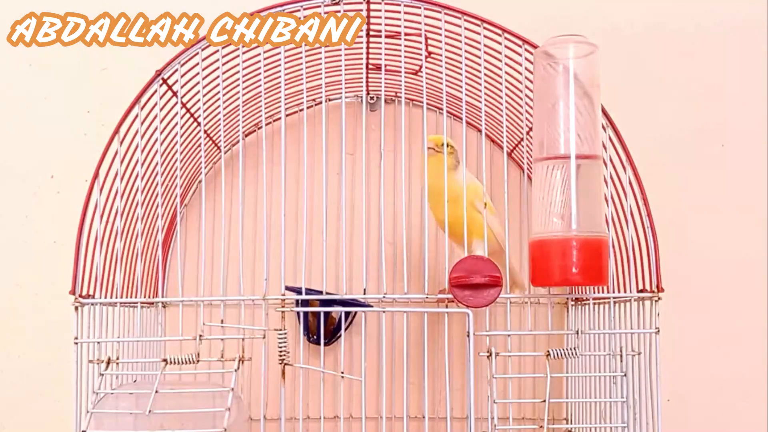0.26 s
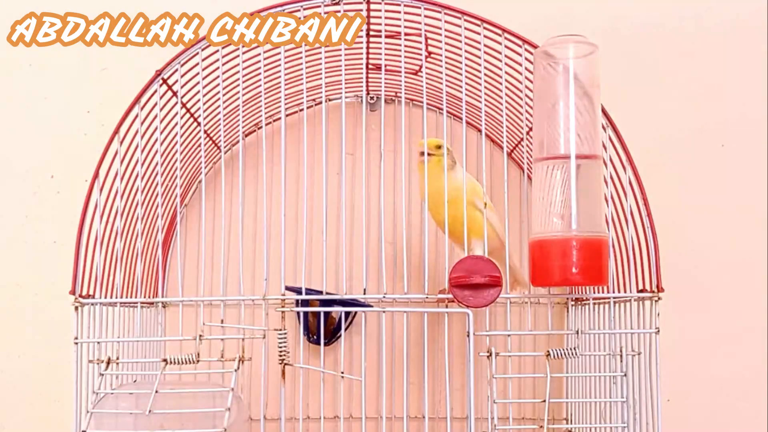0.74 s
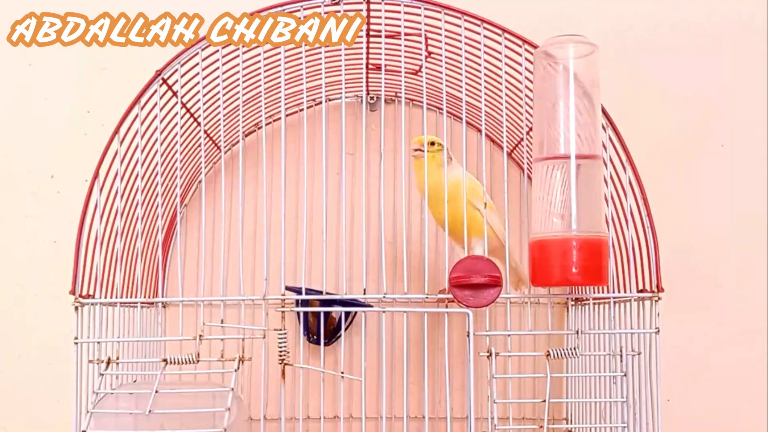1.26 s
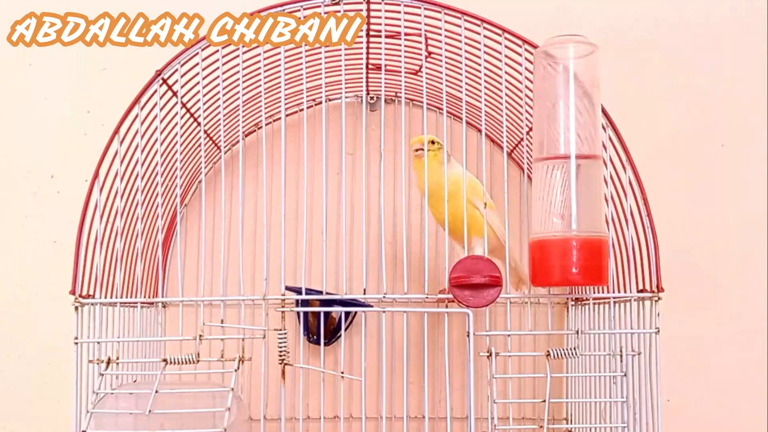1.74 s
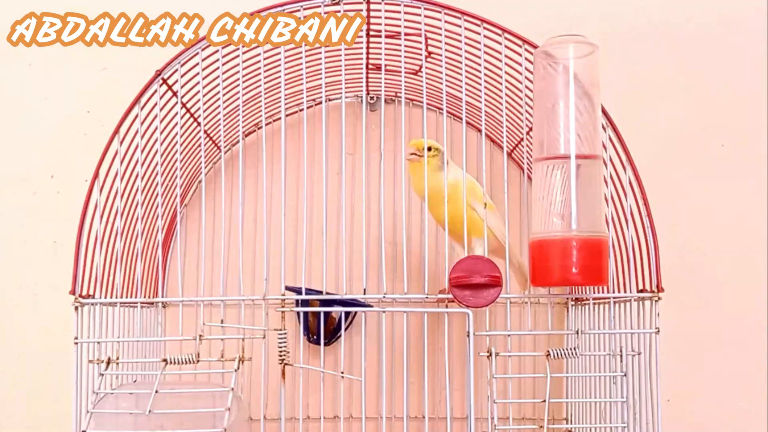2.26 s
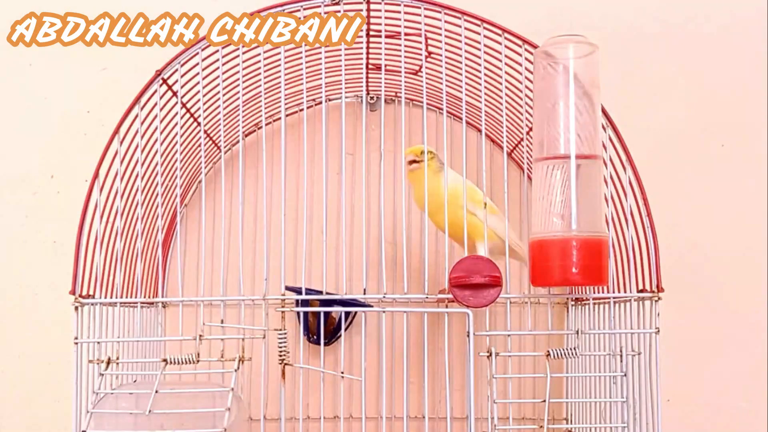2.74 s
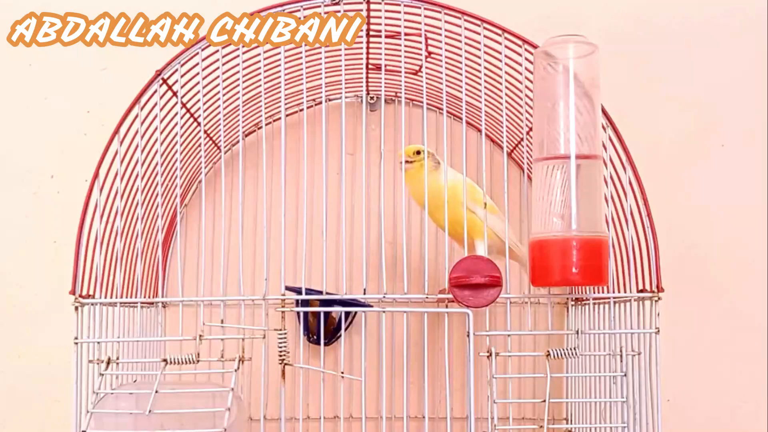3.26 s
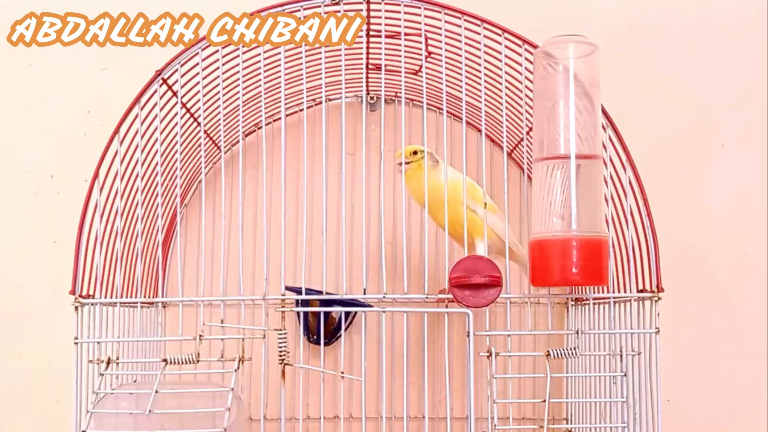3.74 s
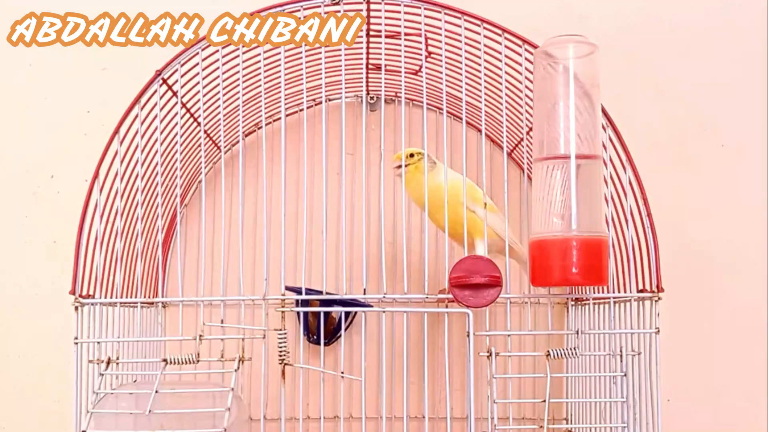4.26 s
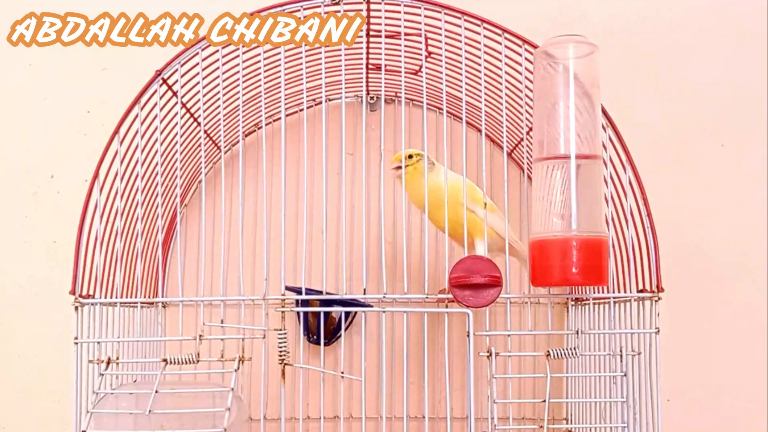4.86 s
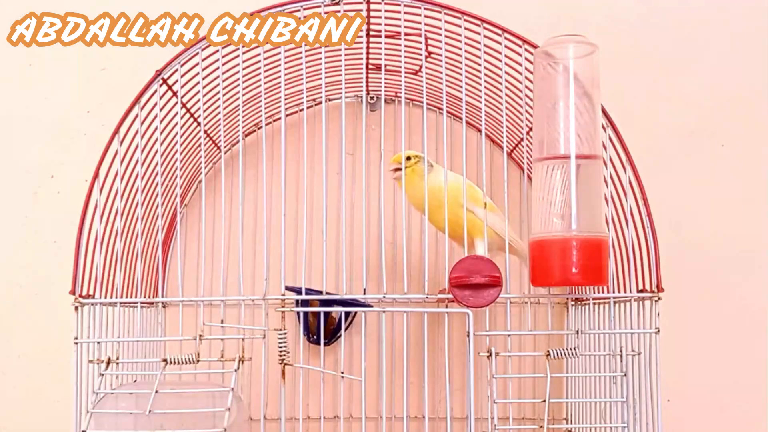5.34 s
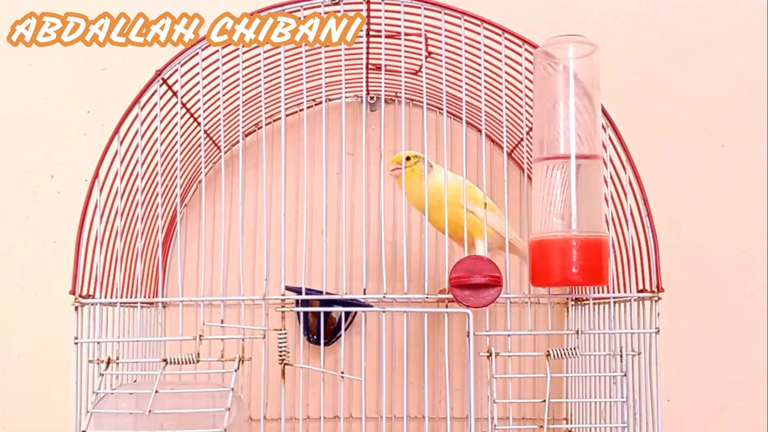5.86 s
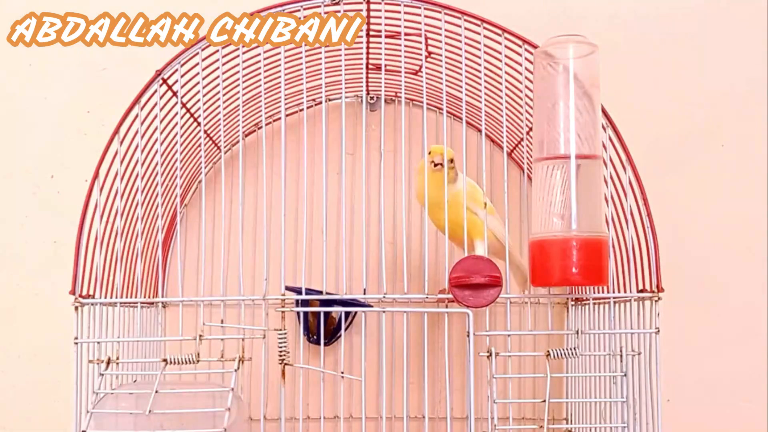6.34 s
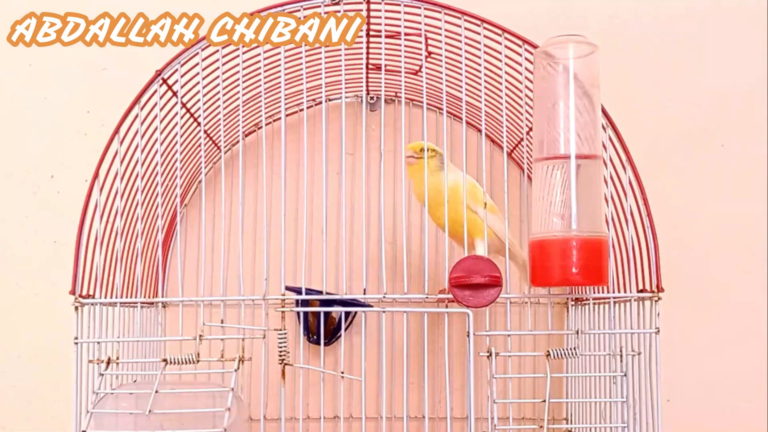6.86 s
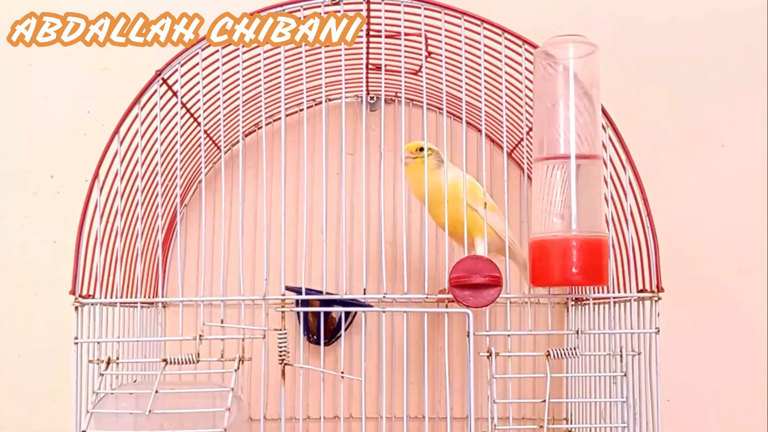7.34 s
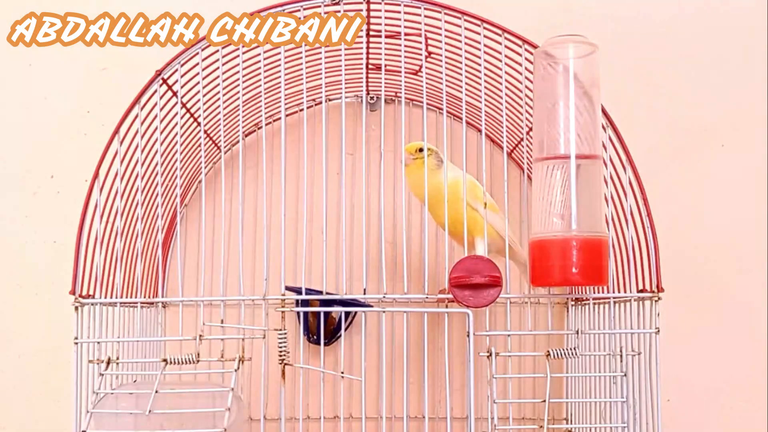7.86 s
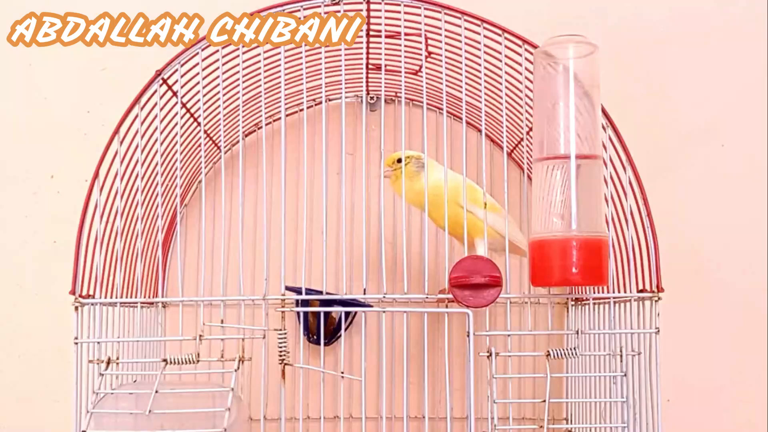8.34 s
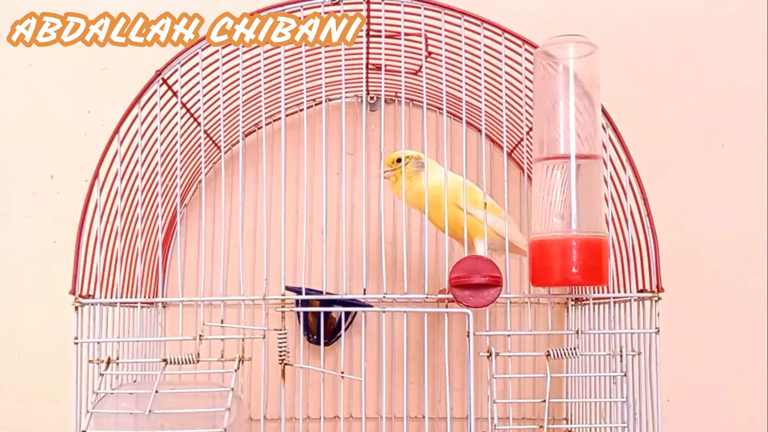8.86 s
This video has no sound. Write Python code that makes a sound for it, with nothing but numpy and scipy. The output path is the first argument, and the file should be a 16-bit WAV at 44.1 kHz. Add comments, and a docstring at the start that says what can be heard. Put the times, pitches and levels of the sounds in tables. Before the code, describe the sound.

A caged canary sings an unbroken chain of fast trills, long whistled slurs and sharp chinks in a bare echoing room, others answering faintly.

```python
"""A bare, echoing room, with a caged canary near the microphone and other canaries farther off.
The near bird sings a chain of trills, slurs, rolls and chinks; the far ones sing along, mostly as echo.
Each syllable is one gliding, almost pure tone, repeated with small changes and smeared by the room.
Buzzy rolls are fast upward strokes of the same tone; the hollow roll is a low throbbing whistle.
Wing beats and dull bumps are puffs of coloured noise, over a faint background hiss of changing level."""
import sys
import numpy as np
from scipy import signal
from scipy.fft import rfft, irfft
from scipy.io import wavfile
from scipy.ndimage import uniform_filter1d, minimum_filter1d, map_coordinates

SR = 44100
rng = np.random.default_rng(int(sys.argv[2]) if len(sys.argv) > 2 else 0)


def inscribe(sig):
    """Save sig as 16-bit PCM at rate SR to the path in sys.argv[1].

    A 1-D sig is mono; a 2-D sig holds one channel per row.
    Samples are clipped to [-1, 1] before scaling.
    """
    pcm = np.round(np.clip(np.atleast_2d(sig).T, -1, 1) * 32767)
    wavfile.write(sys.argv[1], SR, pcm.astype(np.int16))


N = 401310

# Levels are relative: gesture and trill levels add up, then the room and microphone shape them.
# Glide of each syllable before its pitch and length factors: time_ms, pitch_hz, level_db
GESTURES = { "flick": [(0, 4960, -10), (2.5, 5430, -0.5), (5.5, 6690, -2), (9, 7840, 5)],
            "pip": [(0, 1680, -27), (6, 2260, -10), (12.5, 2660, 5), (19, 2820, -3)],
            "rise": [(0, 1543, -28), (6.04, 2300, -3.5), (14.55, 2750, 4.5), (18.96, 3100, -3.5),
            (28, 3450, -5.5)], "tick": [(0, 6900, -25), (3.96, 5700, -16.5), (9.18, 4800, -9),
            (13.5, 4350, -2), (18.03, 3950, -1.5), (21.78, 3520, -6)], "slur": [(0, 2650, -21.5),
            (9.99, 3220, -6), (18.06, 3560, 1), (30.4, 3950, 0), (40.93, 4160, -1), (48.9, 4360, 3),
            (64.1, 4420, -6.5)], "whistle": [(0, 3660, -12), (20, 3610, -3), (55, 3560, 0), (85, 3515, -3),
            (100, 3470, -16)], "dive": [(0, 7600, -18), (22.03, 6900, -17), (41.82, 5900, -9),
            (55.36, 5200, -7), (66.3, 4500, -10.5), (77, 4000, -5), (82.8, 3150, 0), (89.9, 2880, -4.5),
            (96.1, 2140, -13.5)], "swoop": [(0, 7600, -19), (50, 6550, -11), (68, 5700, -18),
            (90, 5100, -10), (112, 4450, -10), (121, 4100, 2.5), (133, 3800, 1.5), (142, 3550, -9)],
            "drop": [(0, 2900, -1), (8.83, 2650, 3.5), (18.12, 2000, -9), (27.14, 1550, -12.5)],
            "chip": [(0, 5250, -6), (5, 5100, 0), (17, 4900, -5)], "squeak": [(0, 6050, -2.5),
            (6, 6750, 3.5), (11, 7000, 1.5), (17, 6600, -5)], "peep": [(0, 3850, -7), (8.3, 4050, 3),
            (17.9, 3950, -2.5), (29.3, 3650, 5.5)], "blip": [(0, 2850, 1), (8, 2450, 2), (15.1, 1890, -5.5),
            (21.9, 1620, -4)], "zip": [(0, 7100, -4.5), (10.1, 6600, 1), (20.2, 5800, -2), (28, 5000, -2)],
            }
# Weak overtones of each syllable, against its fundamental: second_harmonic_db, third_harmonic_db
OVERTONES = {"flick": (-32, -70), "pip": (-46, -57), "rise": (-39, -42.5), "tick": (-27.5, -39),
             "slur": (-39, -42), "whistle": (-32, -37.5), "dive": (-30, -34.5), "swoop": (-25.5, -45),
             "drop": (-62.5, -63), "chip": (-23.5, -33), "squeak": (-38, -60), "peep": (-29, -41),
             "zip": (-32, -60), "blip": (-51, -56)}
# Repeated syllables, from one end of the trill (a) to the other (b, which may be earlier):
# syllable, place, start_a_s, start_b_s, repeats (count),
# slowing (growth of the gaps from a to b, as a share of the mean gap; negative shrinks them),
# level_a_db, level_b_db, middle_swell_db, pitch_a_factor, pitch_b_factor, length_factor
TRILLS = [ ("flick", "near", .0095, 1.007, 18, .067, -26.5, -23.5, -1, 0.96, .92, 0.88),
          ("pip", "near", .0326, .555, 10, .035, -19.5, -20, -2.7, 0.96, 1.003, 1),
          ("tick", "far", .03, .585, 9, -.3, -21, -23.5, -3, .83, 0.92, 1),
          ("rise", "near", .612, 1.096, 9, .013, -18.5, -20.5, -1, 1.055, 1.085, 1),
          ("peep", "near", .676, 1.074, 9, .02, -21.5, -26, -.5, .785, .805, 1),
          ("tick", "near", 1.098, 2.574, 35, .055, -20.5, -23, 1, 0.96, 0.95, 1),
          ("pip", "near", 1.141, 2.09, 14, .122, -28.5, -27.5, -0.6, .92, 0.95, 0.95),
          ("zip", "far", 1.677, 2.045, 6, .02, -29, -33, 1, 1, 1.01, 1),
          ("slur", "near", 2.6685, 4.6065, 24, .085, -18, -21.5, 2.4, 1.001, 0.99, 1),
          ("whistle", "near", 4.195, 4.645, 4, -.1, -16.5, -19.5, 3.6, 1.002, 0.96, 0.94),
          ("dive", "near", 4.692, 6.0075, 11, .045, -20, -20, -.2, .97, .98, 0.99),
          ("slur", "far", 4.89, 5.89, 8, .02, -23.5, -23.5, 0.56, .85, .92, 1),
          ("slur", "far", 6.075, 6.745, 7, -0.11, -23.5, -25, -.5, .99, 0.97, 1.15),
          ("swoop", "near", 6.144, 7.24, 6, .07, -21.5, -22, -0.54, 0.96, 0.97, 0.98),
          ("blip", "near", 6.292, 7.397, 6, 0.065, -32.5, -34, -.5, 1.01, 1.06, 0.98),
          ("pip", "far", 6.821, 7.44, 9, -.08, -24.5, -26.5, -1, 1.04, .92, 0.99),
          ("zip", "far", 7.45, 6.3, 4, 0, -28, -40, 0, .87, 0.92, 1), ]
# Low hollow roll: time_s, pitch_hz, level_db
HOLLOW_ROLL = [(7.499, 2115, -29.5), (7.57, 2195, -22.5), (7.68, 2244, -23.5), (7.79, 2175, -25),
               (7.94, 2188, -28.5), (8.059, 2156, -28), (8.22, 2216, -25.5), (8.455, 2238, -23),
               (8.51, 2225, -44)]
# Strength along one upward stroke of a buzzy roll: share_of_stroke, level_db
BUZZ_STROKE = [(0, -12), (.25, -13.5), (.45, -6), (.7, -2), (.87, 3), (1, -17.5)]
# Wing beats: start_s, level_db
WINGBEATS = [(1.598, -45.5), (2.25, -28.5), (2.291, -41), (2.335, -37.5), (2.381, -39.5), (2.83, -41),
             (5.359, -42.5), (6.498, -46)]
# Relative spectrum of a wing beat: frequency_hz, density_db (per Hz)
WING_SPECTRUM = [(120, -51), (220, -21.5), (290, 4), (420, 0), (700, -4), (1200, -13), (2000, -13),
                 (4000, -19), (9000, -47.5)]
# Relative spectrum of the background hiss: frequency_hz, density_db (per Hz)
BACKGROUND_HISS_SPECTRUM = [(20, -11), (60, -2), (130, -5.5), (190, -4.5), (300, 1), (450, -1), (800, -7),
                            (1400, -11), (4000, -10), (10000, -25.5), (15000, -34.5)]
# Level of the background hiss, before its overall lift: time_s, level_db
BACKGROUND_HISS_LEVEL = [(0, -55), (2, -55.5), (2.9, -51), (4.3, -54.5), (5, -57.5), (6.6, -56), (7.7, -64),
                         (8.5, -57), (9.1, -62)]
# Time for the echo to die by 60 dB: frequency_hz, decay_s
ROOM_T60 = [(250, 1), (1000, 1), (2500, 1), (4500, 0.97), (7000, 0.72), (10000, 0.87), (15000, 0.43)]
# Hard reflections off nearby surfaces: delay_s, gain (factor)
REFLECTIONS = [(.0034, .34), (.0098, 0.7), (.0142, 0.22), (.0205, 0.34), (.028, 0.32)]
# Colour of the microphone: frequency_hz, gain_db
MICROPHONE = [(100, -1), (4500, 3), (6500, -8), (7400, -5), (8000, -3.5), (9500, 12.5), (11000, 2),
              (12000, -0.5), (13200, 1.5), (15000, 8)]
# Buzzy rolls: start_s, end_s, place, level_db, attack_s, release_s, stroke_foot_hz, stroke_top_hz
BUZZES = [(3.547, 4.445, "far", -46.5, 0.26, 0.34, 806, 2204),
          (4.9, 5.55, "far", -49.5, .1, 0.34, 1200, 2200),
          (8.55, 9.11, "far", -32, 0.027, .005, 1252, 3880)]
# Dull bumps: start_s, level_db
BUMPS = [(.87, -47.5), (.99, -46), (1.11, -51)]
# Relative spectrum of a bump: frequency_hz, density_db (per Hz)
BUMP_SPECTRUM = [(30, -25), (70, -13), (115, -3.5), (170, -9.5), (300, -15), (750, -12.5), (1300, -37),
                 (4000, -60)]
# Colour of the straight path to the microphone: frequency_hz, gain_db
DIRECT_PATH = [(300, -6), (1750, 2), (2200, 0), (2700, 3), (3200, -5), (3800, 3.5), (4400, -8), (5200, 3),
               (6000, -4), (7200, -2), (11000, 2), (15000, 0)]
# Single calls: start_s, syllable, place, level_db, pitch_factor, length_factor
SINGLE_CALLS = [ (.885, "peep", "near", -26, 0.95, 0.95), (.938, "whistle", "near", -20, 1.05, 0.46),
                (1.0, "whistle", "near", -19, 1.243, .55), (1.045, "whistle", "near", -20.5, 1.24, 1.1),
                (.995, "peep", "far", -24, 1.02, 1.2), (2.125, "drop", "far", -30, 0.7, 0.86),
                (2.22, "drop", "near", -28, 0.98, 1.22), (2.337, "drop", "near", -25.5, 1.083, 1.22),
                (3.233, "rise", "near", -27, 1.19, .9), (3.505, "drop", "far", -30, 1.11, 1.2),
                (4.185, "whistle", "far", -45.5, 1.5, .8), (4.92, "whistle", "far", -26.5, 1.355, 1.4),
                (5.44, "whistle", "far", -21.5, 1.236, 1.1), (5.58, "whistle", "far", -29, 1.218, 4),
                (7.545, "drop", "far", -29.5, 1.07, 1.16), (8.349, "squeak", "near", -28.5, 0.9, 1.6),
                (8.48, "peep", "far", -40.5, .78, 1.2), (8.565, "peep", "near", -34, 0.77, .6),
                (9.078, "tick", "near", -27.5, 0.85, 1.54), ]
# Two-voiced chinks: start_s, level_db, pitch_factor
CHINKS = [(7.7, -33.5, 1), (7.797, -35.5, .92), (7.948, -26.5, 1.005), (8.172, -29, .955),
          (8.446, -30, .955)]


def amp(db):
    """Decibels to gain."""
    return 10 ** (np.asarray(db) / 20)


def read(points, hz):
    """A spectrum table read on a log-frequency axis."""
    table_hz, value = np.transpose(points)
    return np.interp(np.log(hz + 1), np.log(table_hz), value)


def follow(rows, t):
    """The columns of a curve table, read at the positions t of its first column."""
    position, *columns = np.transpose(rows)
    return [np.interp(t, position, column) for column in columns]


def colour(x, points):
    """Filters x by a spectrum table."""
    hz = np.fft.rfftfreq(len(x), 1 / SR)
    return irfft(rfft(x) * amp(read(points, hz)), len(x))


def noise(points):
    """Coloured noise of rms 1."""
    x = colour(rng.standard_normal(N), points)
    return x / x.std()


def wander(t, per_s):
    """Smooth chance of about unit size, through per_s random knots a second."""
    knots = rng.standard_normal(512)
    return map_coordinates(knots, [(t - t[0]) * per_s], order=3, mode="wrap")


def add(mix, start_s, sound):
    """Mixes a sound in at start_s."""
    part = mix[max(round(start_s * SR), 0):][:len(sound)]
    part += sound[:len(part)]


def background_hiss(lift_db=0):
    """A faint hiss: coloured noise of changing level."""
    level_db = follow(BACKGROUND_HISS_LEVEL, np.arange(N) / SR)[0]
    return noise(BACKGROUND_HISS_SPECTRUM) * amp(lift_db + level_db)


def song(place):
    """All the trills, single calls and buzzy rolls sung from one place."""
    trills = sum(trill(name, *row) for name, where, *row in TRILLS if where == place)
    singles = calls([(start_s, name, *row) for start_s, name, where, *row in SINGLE_CALLS if where == place])
    buzzes = sum(buzzy_roll(start_s, end_s, *row) for start_s, end_s, where, *row in BUZZES if where == place)
    return trills + singles + buzzes


def trill(name, start_a_s, start_b_s, repeats, slowing, a_db, b_db, swell_db,
          a_pitch, b_pitch, length, uneven_db=1.1):
    """One syllable repeated at a steadily changing pace; its level follows an arch and its pitch drifts."""
    u = np.linspace(0, 1, round(repeats))  # from end a to end b of the trill
    arch = u * (1 - u)
    starts = start_a_s + (start_b_s - start_a_s) * (u - slowing / 2 * arch)
    db = a_db + (b_db - a_db) * u + swell_db * arch / arch.max()
    db = db + uneven_db * rng.standard_normal(len(u))
    pitch = a_pitch + (b_pitch - a_pitch) * u
    return calls([(s, name, level_db, factor, length) for s, level_db, factor in zip(starts, db, pitch)])


def calls(rows):
    """Syllables laid out in time, each with its own level, pitch and length."""
    out = np.zeros(N)
    for start_s, name, db, pitch, length in rows:
        add(out, start_s, syllable(name, db, pitch, length))
    return out


def syllable(name, db, pitch, length=1, scatter=0.002994, tremor=0.0041, waver_db=2):
    """One gesture; pitch and strength waver, so no two renditions are quite alike."""
    # a finer step through the gesture makes it last longer
    gesture_ms = np.arange(0, GESTURES[name][-1][0], 1000 / SR / length)
    t = np.arange(len(gesture_ms)) / SR
    hz, shape_db = follow(GESTURES[name], gesture_ms)
    hz = hz * pitch * (1 + scatter * rng.standard_normal() + tremor * wander(t, 204.4))
    return syrinx(hz, db + shape_db + waver_db * wander(t, 112.7), *OVERTONES[name])


def syrinx(hz, db, second_db, third_db):
    """A near sine on a pitch curve, with weak overtones and soft ends."""
    phase = 2 * np.pi * np.cumsum(hz) / SR
    tone = np.sin(phase)
    for k, level_db in enumerate([second_db, third_db], 2):
        below_nyquist = k * hz < SR / 2
        tone += amp(level_db) * np.sin(k * phase) * below_nyquist
    ends = signal.windows.tukey(len(hz), min(1, 0.0051 * SR / len(hz)))  # both fades together take 5.1 ms
    return tone * amp(db) * ends


def puffs(rows, spectrum, swell_s):
    """Soft bursts of noise, each peaking swell_s after its start and then dying."""
    t, push = np.arange(N) / SR, np.zeros(N)
    for start_s, db in rows:
        age = np.maximum(t - start_s, 0) / swell_s
        push += amp(db) * age * np.exp(1 - age)
    return push * noise(spectrum)


def bumps():
    """Dull bumps: short puffs of low noise."""
    return puffs(BUMPS, BUMP_SPECTRUM, swell_s=0.013)


def wingbeats():
    """Air through feathers: a still shorter puff of noise for each beat."""
    return puffs(WINGBEATS, WING_SPECTRUM, swell_s=0.0079)


def buzzy_roll(start_s, end_s, db, attack_s, release_s, foot_hz, top_hz, strokes_per_s=70, uneven_db=3.5):
    """Upward strokes so fast that they fuse into a rattle; it swells, holds and dies."""
    t = np.arange(start_s, end_s, 1 / SR)
    envelope = np.clip(np.minimum((t - start_s) / attack_s, (end_s - t) / release_s), 0, 1)
    stroke = np.cumsum(strokes_per_s * (1 + 0.15 * wander(t, 45))) / SR % 1  # 0 at the foot, 1 at the top
    hz = foot_hz + (top_hz - foot_hz) * stroke
    db = db + uneven_db * wander(t, 90) + follow(BUZZ_STROKE, stroke)[0]
    tone = syrinx(hz, db, second_db=-37.0, third_db=-48.5)
    # fade the first and last tenth of each stroke, hiding the pitch jump
    edge = np.minimum(1, 10 * np.minimum(stroke, 1 - stroke))
    out = np.zeros(N)
    add(out, start_s, envelope * tone * np.sin(np.pi / 2 * edge) ** 2)
    return out


def hollow_roll(pulses_per_s=42, swing_hz=30, dip_db=18, accent_db=2.5):
    """A low whistle that throbs unevenly, its pitch swinging with each pulse."""
    t = np.arange(HOLLOW_ROLL[0][0], HOLLOW_ROLL[-1][0], 1 / SR)
    hz, db = follow(HOLLOW_ROLL, t)
    beat = 2 * np.pi * np.cumsum(pulses_per_s * (1 + .1 * wander(t, 25.05))) / SR
    db = db + dip_db * (np.cos(beat) - 1) / 2 + accent_db * wander(t, 35.3)
    hz = hz + swing_hz * np.sin(beat) + 18 * wander(t, 50)
    out = np.zeros(N)
    add(out, t[0], syrinx(hz, db, second_db=-34, third_db=-40))
    return out


def chinks(chip_lag_s=.008, squeak_db=-5.5, squeak_pitch=.98):
    """The two sides of the syrinx sound almost together: a high squeak, a lower chip just behind."""
    high = calls([(s, "squeak", db + squeak_db, pitch * squeak_pitch, 1) for s, db, pitch in CHINKS])
    low = calls([(s + chip_lag_s, "chip", db, pitch, 1) for s, db, pitch in CHINKS])
    return high + low


def echo_tail(build_s):
    """Dense echo of unit energy: noise that builds up, then dies at its own rate in each band."""
    hz, t, z = signal.stft(rng.standard_normal(int(SR * 1.2)), SR, nperseg=256)
    decay = amp(-60 * t / read(ROOM_T60, hz)[:, None])
    tail = signal.istft(z * decay, SR, nperseg=256)[1]
    tail *= 1 - np.exp(-np.arange(len(tail)) / SR / build_s)
    return tail / np.linalg.norm(tail)


def room(near, far, tail_db=1, build_s=0.022, far_direct_db=-9):
    """Direct sound, a few hard reflections and a dense tail; distance weakens all but the tail."""
    # the opening is also fed in ahead, unheard, so the room rings from the start
    x, lead = near + far, round(.29 * SR)
    tail = signal.fftconvolve(np.r_[x[:lead], x], echo_tail(build_s))
    out = amp(tail_db) * tail[lead:lead + N]
    early = near + amp(far_direct_db) * far
    add(out, .001, .95 * colour(early, DIRECT_PATH))  # straight path: 1 ms delay
    for delay_s, gain in REFLECTIONS:
        add(out, delay_s, gain * early)
    return out


def scene():
    """Birds, wings and bumps in the room; sounds placed "far" are heard mostly as echo."""
    near = song("near") + chinks() + hollow_roll()
    far = song("far") + wingbeats() + bumps()
    return (room(near, far) + background_hiss(lift_db=1.5))[None]


def record(dry, ceiling=.86, edge_hz=15750):
    """Microphone colour, a quick peak limiter, then a low-pass at the band edge."""
    heard = colour(dry[0], MICROPHONE)
    allowed = np.minimum(1, ceiling / (abs(heard) + 1e-9))
    # hold the lowest gain over 200 samples, then smooth it
    heard = heard * uniform_filter1d(minimum_filter1d(allowed, size=200), size=200)
    low_pass = signal.firwin(511, edge_hz, window=("kaiser", 9), fs=SR)
    return signal.oaconvolve(heard, low_pass, "same")[None]


dry = scene()
out = record(dry)
inscribe(out)
```